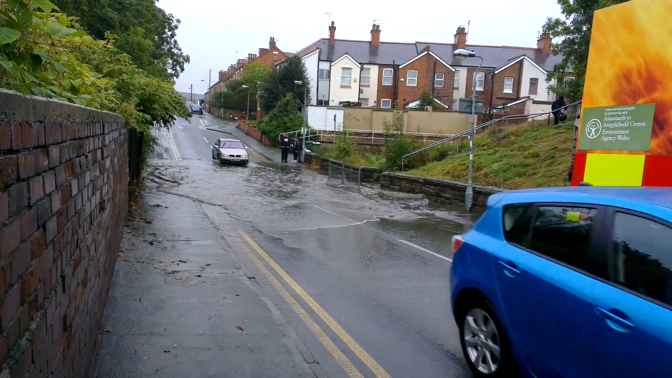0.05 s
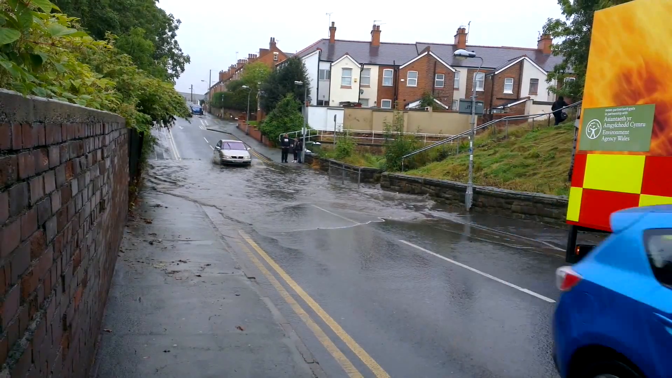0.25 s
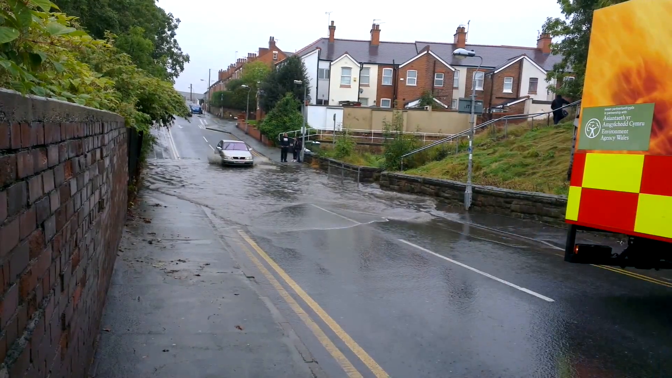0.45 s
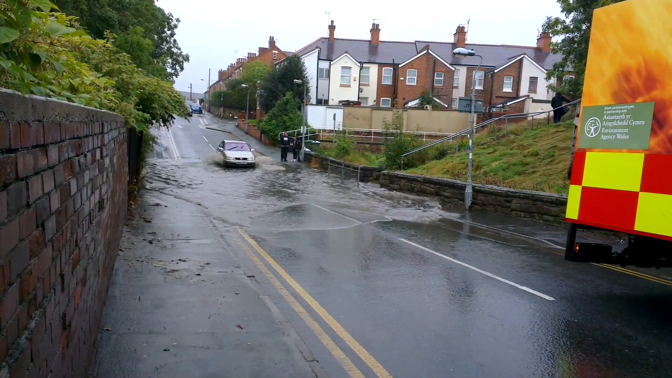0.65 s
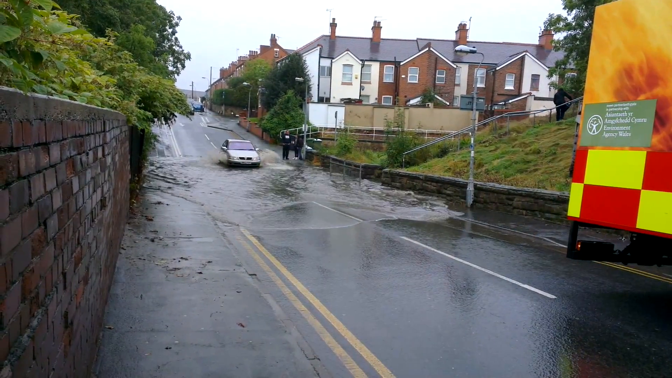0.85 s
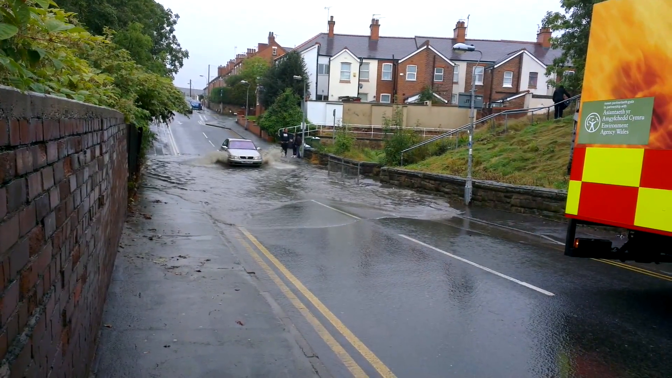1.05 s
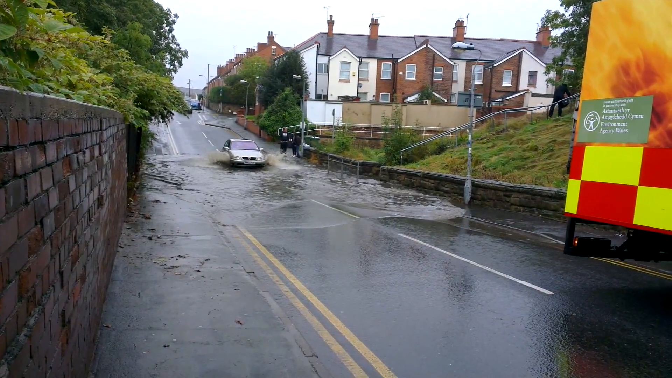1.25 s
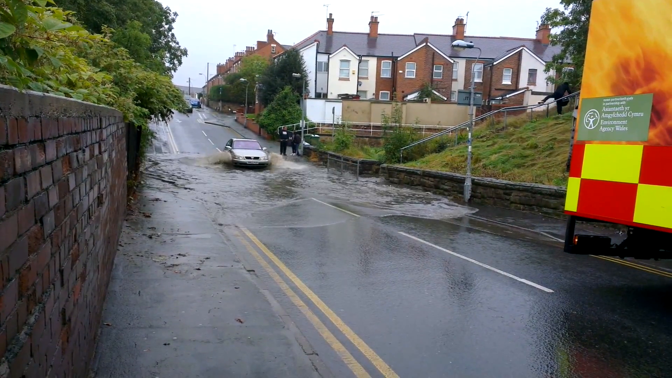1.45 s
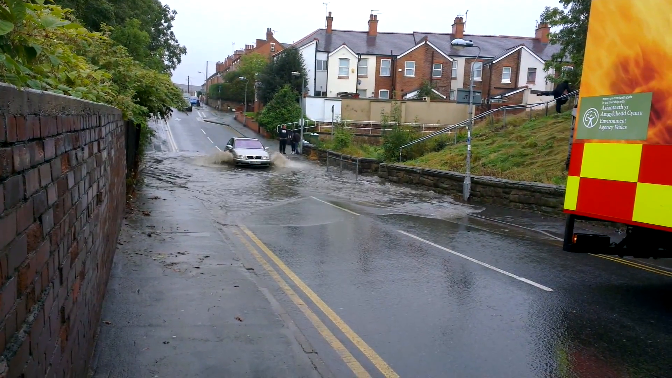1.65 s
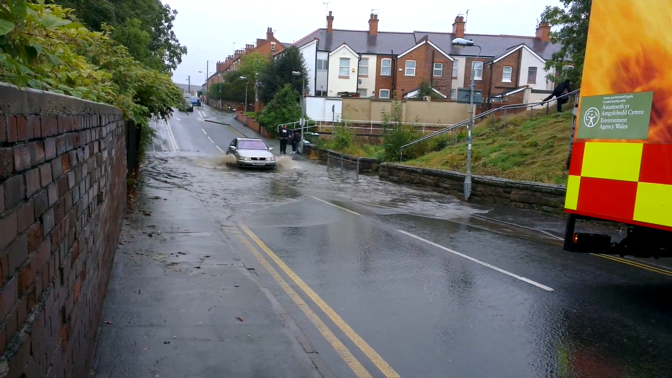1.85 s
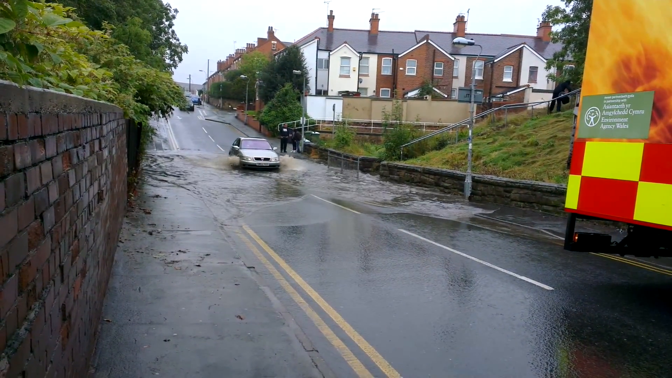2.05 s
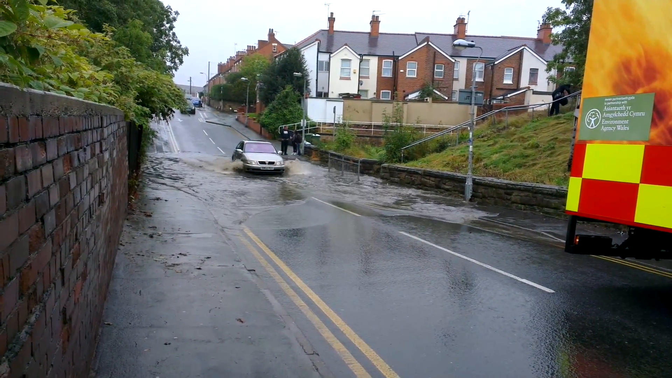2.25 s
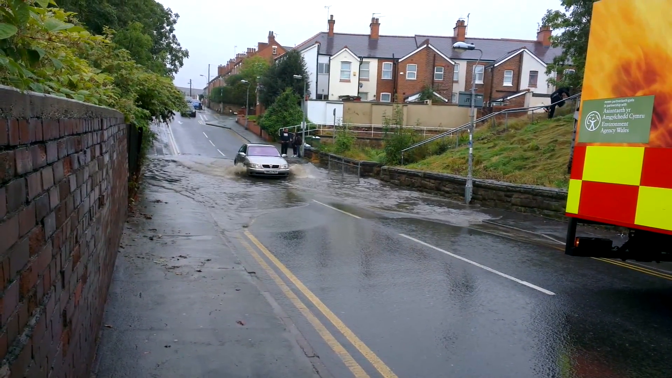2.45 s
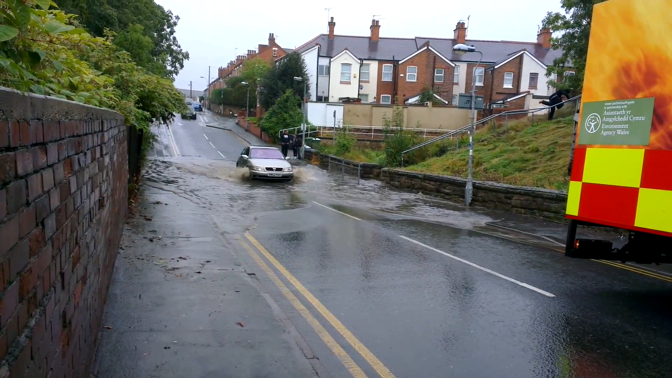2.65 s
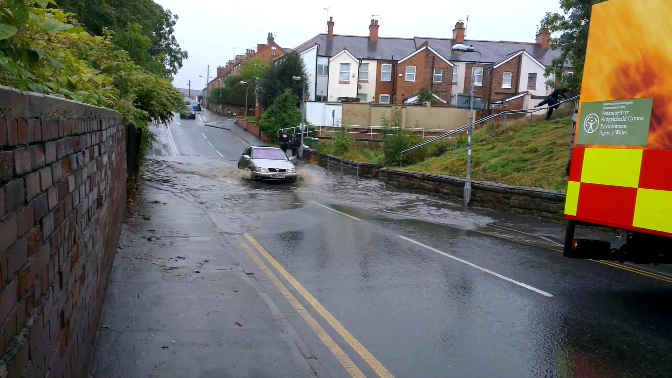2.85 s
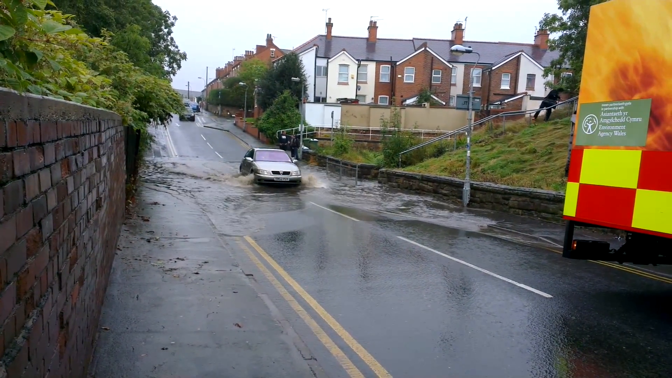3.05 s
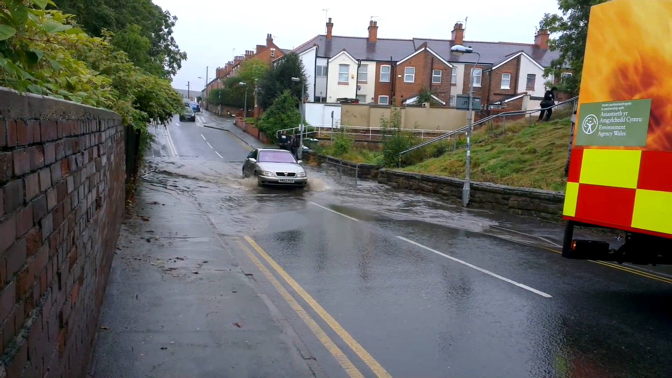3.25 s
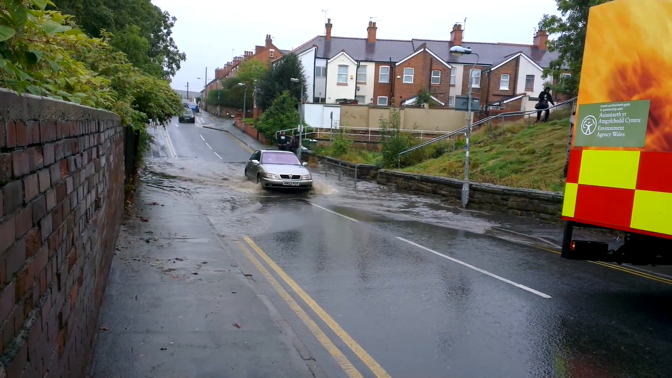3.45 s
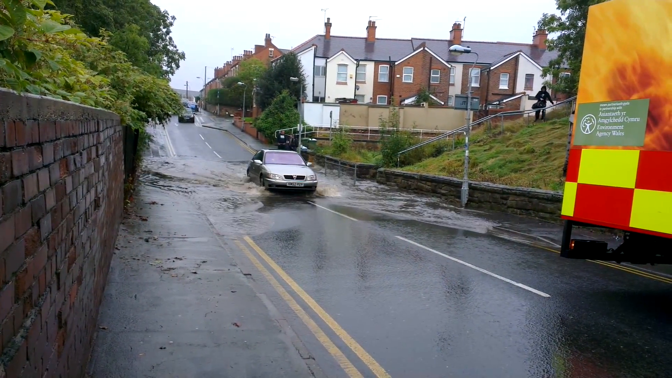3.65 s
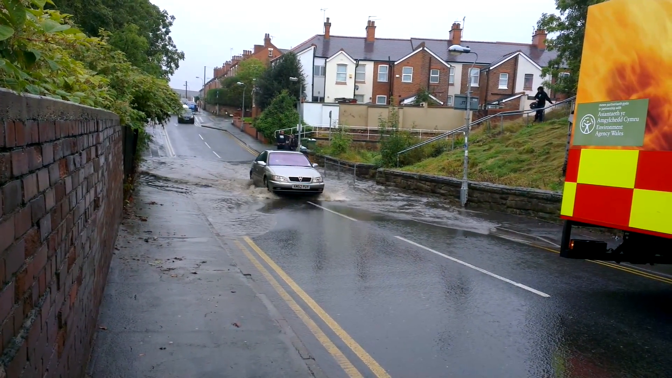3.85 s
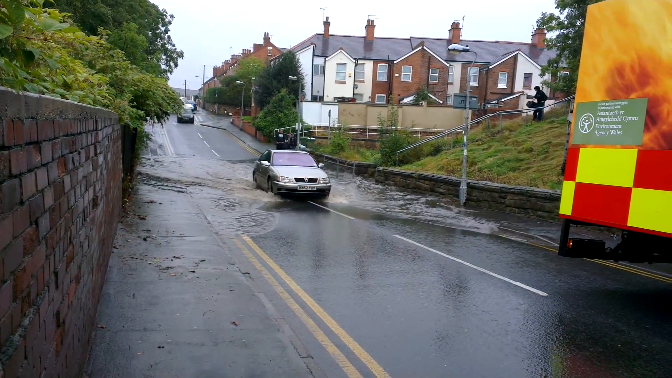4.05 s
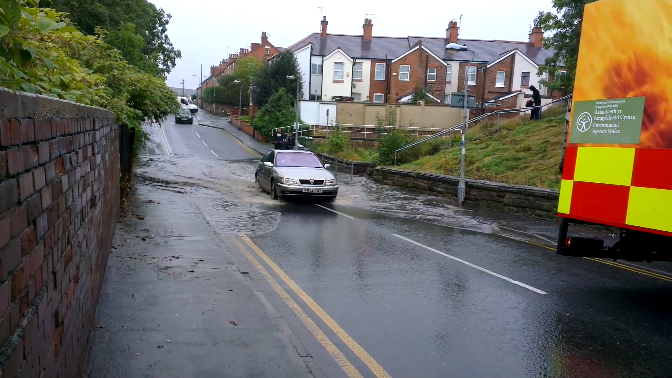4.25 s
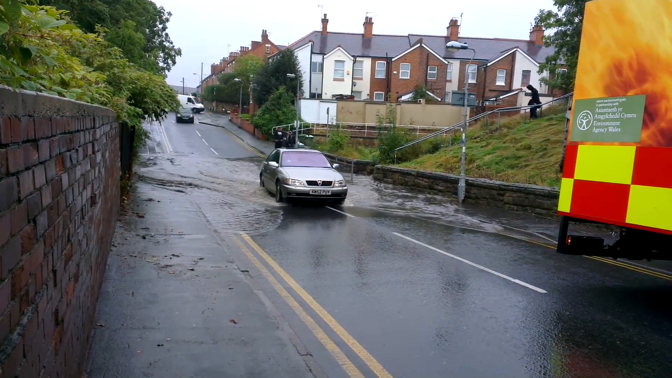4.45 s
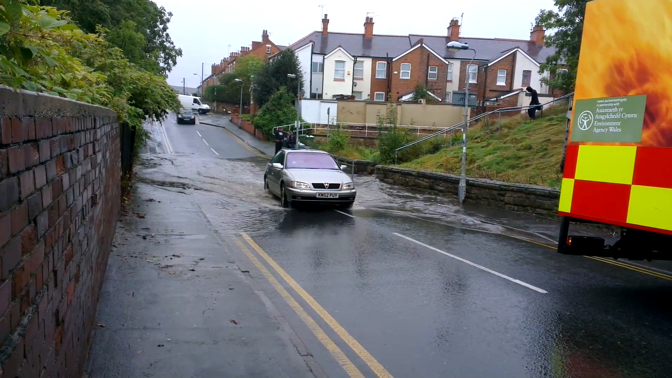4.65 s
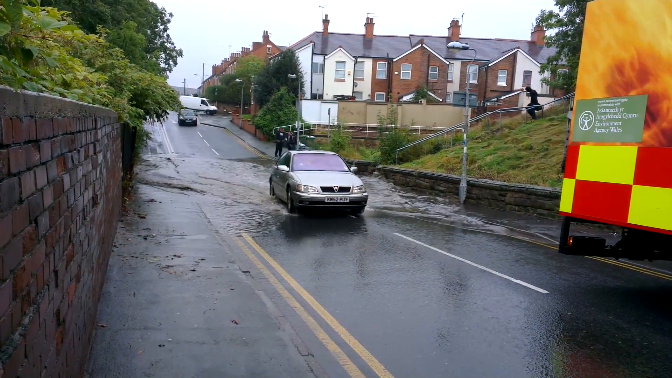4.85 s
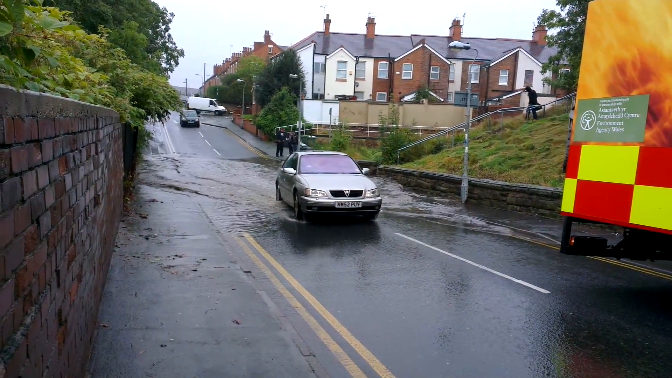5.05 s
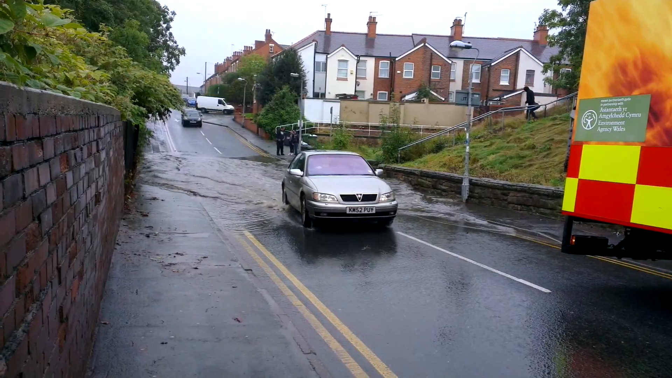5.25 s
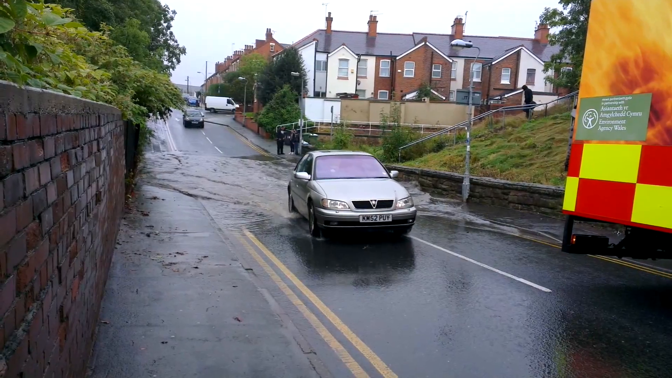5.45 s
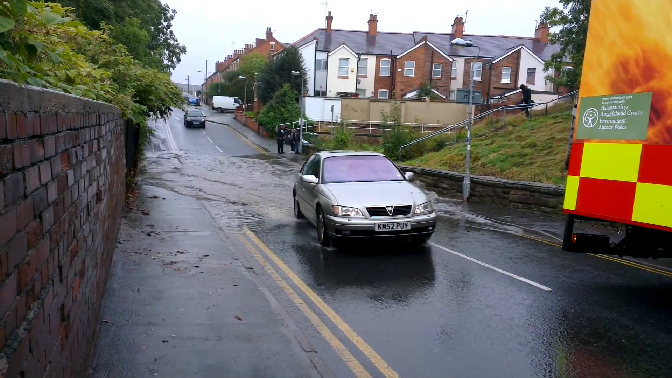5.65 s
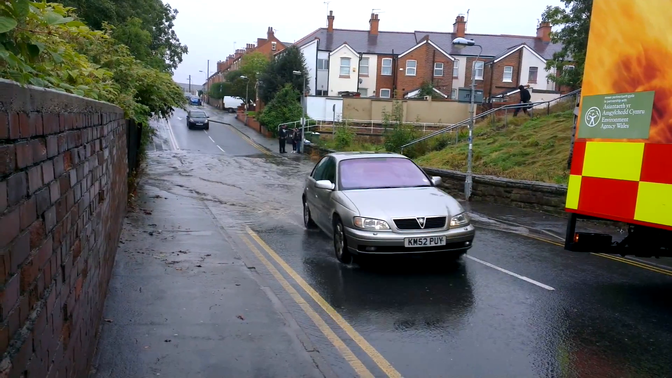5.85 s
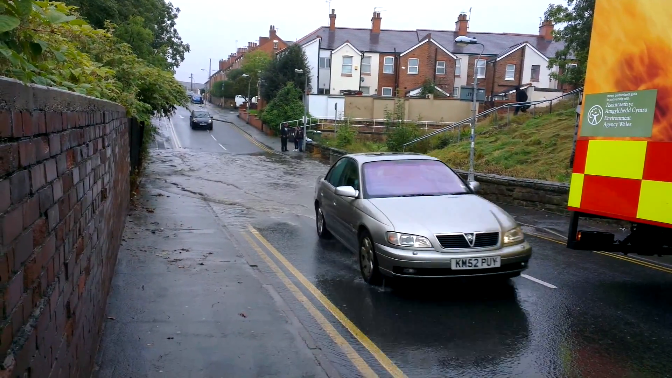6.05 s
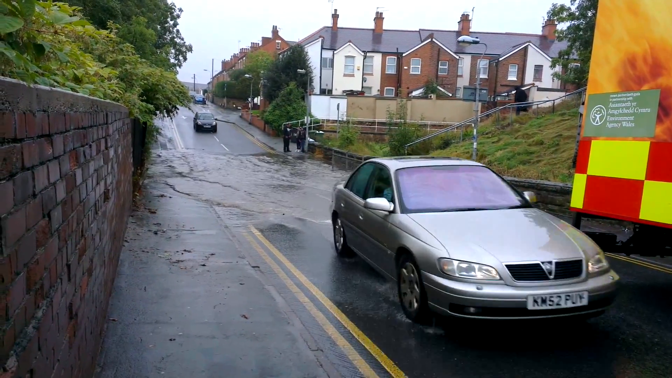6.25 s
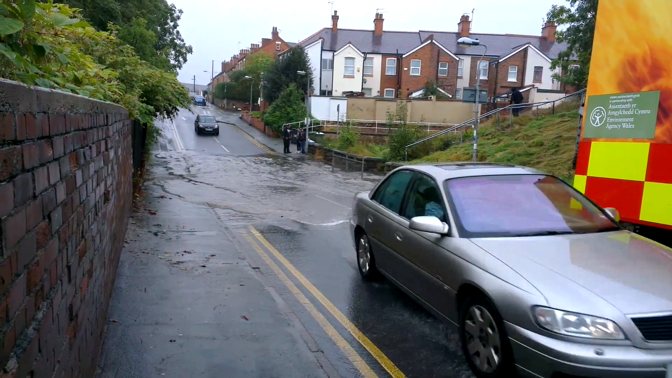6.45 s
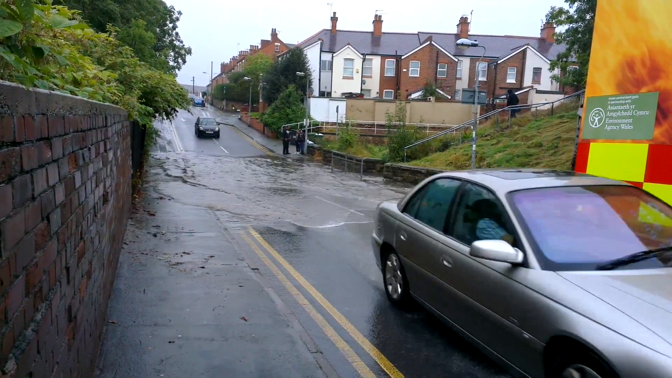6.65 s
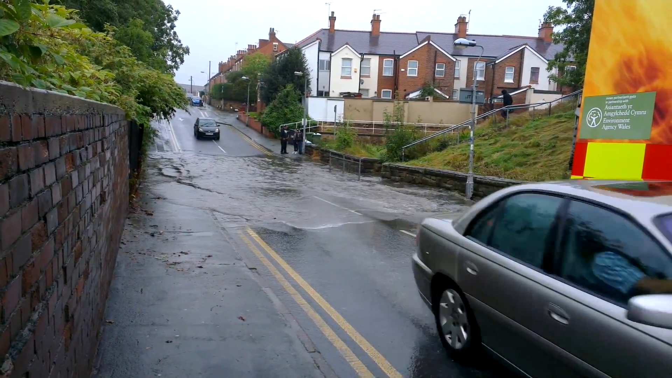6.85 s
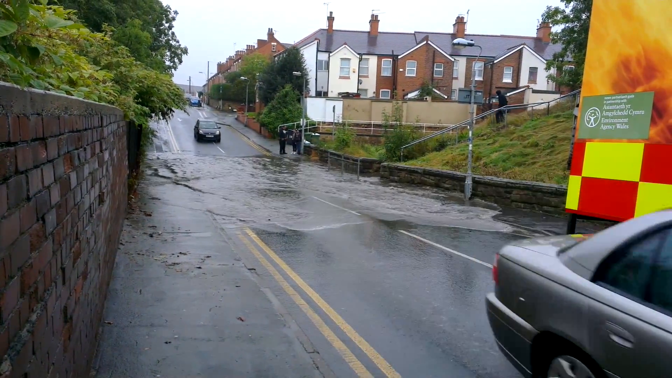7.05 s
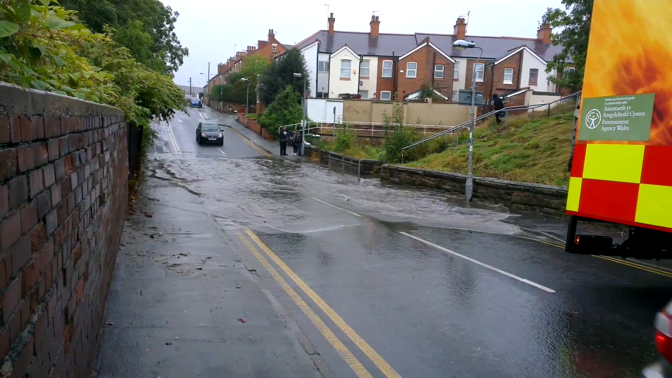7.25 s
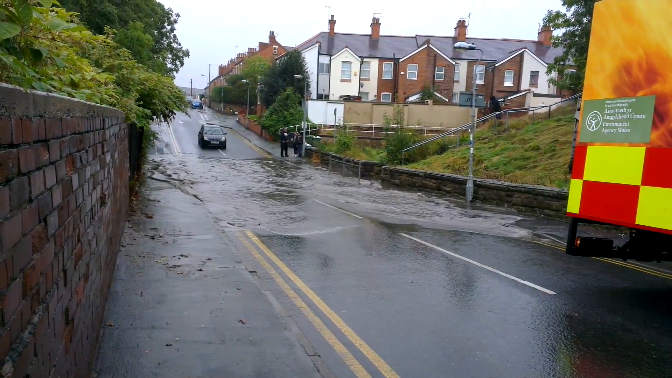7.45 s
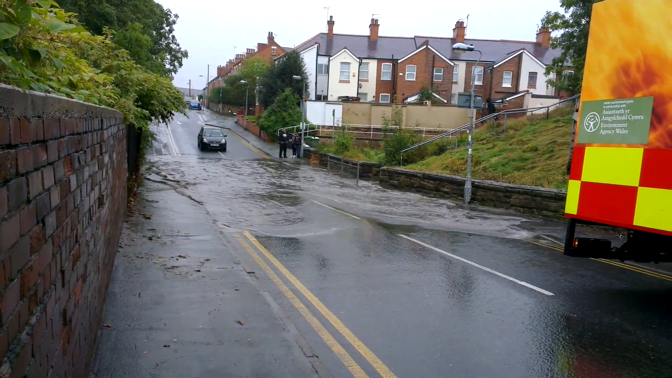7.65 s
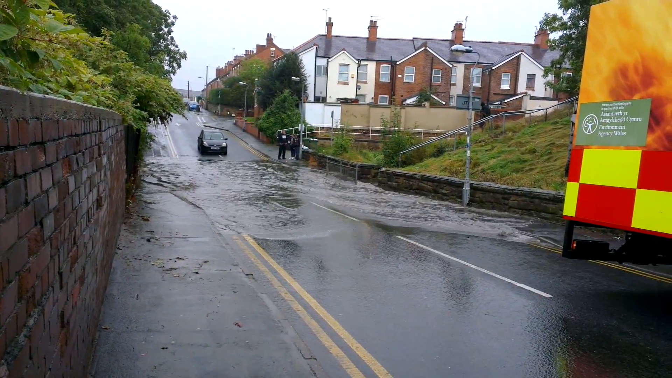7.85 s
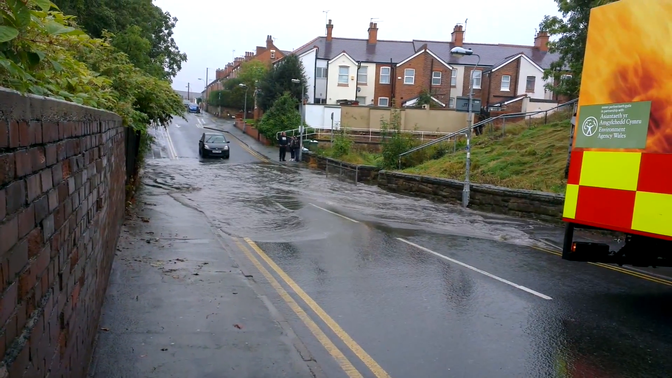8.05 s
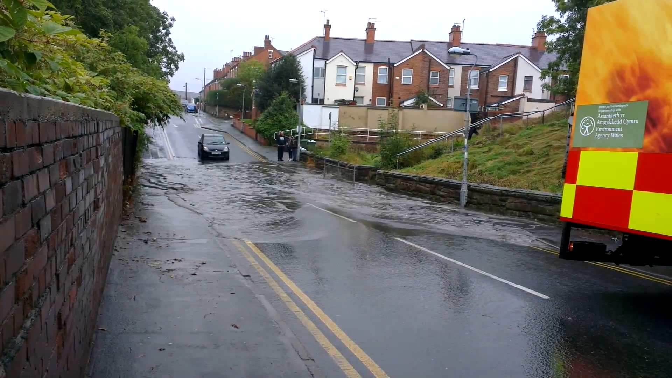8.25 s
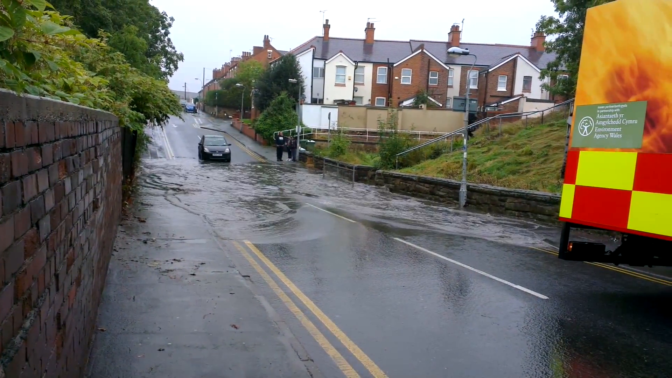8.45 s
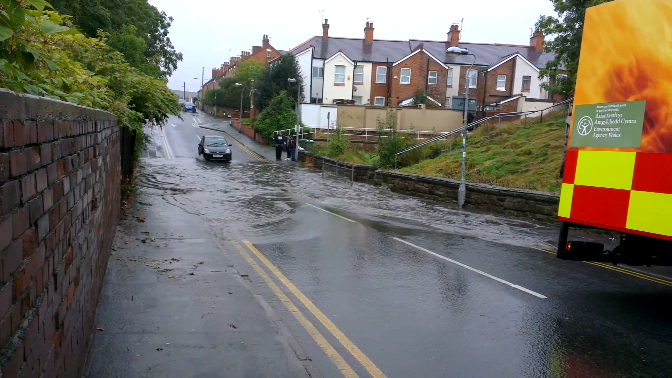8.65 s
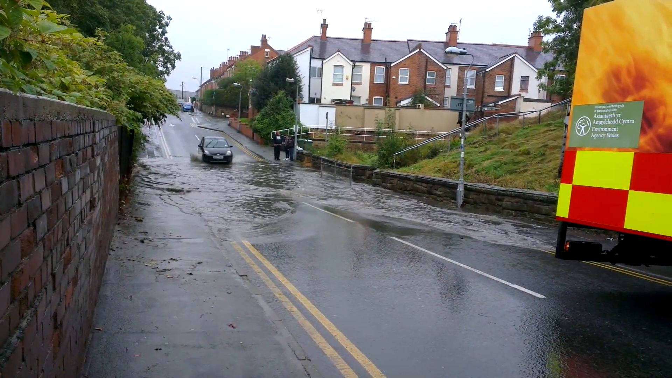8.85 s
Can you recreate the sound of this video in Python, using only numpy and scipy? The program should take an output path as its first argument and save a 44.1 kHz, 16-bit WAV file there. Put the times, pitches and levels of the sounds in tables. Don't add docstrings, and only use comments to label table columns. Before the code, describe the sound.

Outdoors by a wet road, thin-sounding wide stereo. Loud tyre hiss and splatter at the start drop away within about two seconds, leaving softer water wash and the fast, even chug of an idling diesel with irregular ticks to the right. A short high squeak slides downward, then another car rushes by close in a broad, gritty, fluttering wash of spray that ebbs to a lighter hiss and idle.

```python
import sys
import numpy as np
from scipy import signal
from scipy.fft import rfft, irfft, next_fast_len
from scipy.io import wavfile
from scipy.ndimage import uniform_filter1d

SR = 44100
rng = np.random.default_rng(int(sys.argv[2]) if len(sys.argv) > 2 else 0)


def gain_from_decibels(decibels):
    exponent = np.asarray(decibels, float) / 20
    return 10 ** exponent


def dump_mix(stems):
    frames = np.atleast_2d(stems).T
    limited = np.clip(frames, -1, 1)
    pcm = np.round(limited * 32767).astype(np.int16)
    wavfile.write(sys.argv[1], SR, pcm)


N = 392490
IDLE_HZ = 5.0


def evened(x):
    return x / np.sqrt(np.mean(x ** 2) + 1e-20)


def bump(x, centre, width):
    return np.exp(-.5 * ((x - centre) / width) ** 2)


def read(points, hz):
    f, value = np.transpose(points)
    return np.interp(np.log(hz + 1), np.log(f + 1), value)


def resonate(x, hz, width):
    turn = np.exp(2j * np.pi * np.cumsum(hz * np.ones(len(x))) / SR)
    r = np.exp(-np.pi * width / SR)
    return 2 * (turn * signal.lfilter([1 - r], [1, -r], x / turn)).real


def spectra(x):
    return signal.stft(x, SR, nperseg=512, noverlap=384)


# (frequency [Hz], side over mid [dB])
WIDTH_FAR = [(300, -18), (550, -5), (800, -8), (1200, 4.5), (1600, 3.5), (2500, -4.5), (4000, -2),
             (6000, -2.5), (9000, -1.5), (13000, -0.5)]
WIDTH_NEAR = [(300, -17), (550, -6.5), (800, -7.5), (1200, -3.5), (1600, 2), (2500, -3.5), (4000, -1),
              (6000, -1), (9000, -2.5), (13000, -2)]
# (frequency [Hz], share of side that follows mid [-])
LEAN = [(300, -0.15), (2100, 0.57), (3200, -0.12), (5000, -0.47), (7000, -0.86), (8200, -0.14),
        (9600, 0.51), (11500, 0.14), (14000, -1.7)]


def microphone_pair(z, hz, nearness):
    width_db = read(WIDTH_FAR, hz)[:, None] * (1 - nearness) + read(WIDTH_NEAR, hz)[:, None] * nearness
    lean = np.clip(read(LEAN, hz), -1, 1)[:, None]
    side = gain_from_decibels(width_db) * (lean * z[0] + np.sqrt(1 - lean ** 2) * z[1])
    return signal.istft(np.array([z[0], side]), SR, nperseg=512, noverlap=384)[1][:, :N]


# (time [s], wheels churning water [dB], water thrown up [dB], road roar lift [dB],
# left over right [dB])
CARS = [(0, -17.5, -13.5, -2, 4), (.57, -17, -15.5, 0.5, 5), (.8, -20.5, -20.5, 1.5, 1),
        (.85, -19, -26.5, 0.5, 0), (1.25, -17, -25.5, 0, -4), (1.7, -22, -30.5, -0.5, -0.5),
        (2.3, -24.5, -30, 1.5, -1), (3.9, -26, -28, 2, 0), (4.83, -29.5, -29, 1.5, 1),
        (4.96, -22, -22.5, -1.5, 2.5), (5.5, -19.5, -17, 1, 2), (6.1, -20, -15, -1.5, 0.5),
        (6.6, -15.5, -13, -1, 5), (7.1, -17, -12, 3.5, 1), (7.5, -18.5, -17, 3.5, 3.5),
        (7.85, -16.5, -25.5, 2, -4), (8.3, -20.5, -31.5, 0, -1.5), (8.9, -22.5, -34.5, -5.5, 4.5)]
# (time [s], length [s], change
# of roar and churn [dB], change of spray and mist [dB])
SURGES = [(0.104, .03, 2, 2.5), (.24, 0.049, 1.6, 2), (.305, .018, -2.5, -4),
          (0.394, 0.014, 1.5, 2.5), (.47, 0.04, -1.5, -3), (0.568, 0.026, 3, 2),
          (.66, 0.044, -2, -3.5), (0.766, .03, 0.5, 2), (0.85, 0.018, -2, -1.5),
          (.915, 0.019, 4.5, 4), (1.107, 0.026, 2, 0.5), (1.208, 0.052, 0, 3.5), (1.57, .05, 1, 1),
          (1.713, 0.021, -2.5, -2), (1.78, 0.027, 3, 0), (1.99, 0.036, 2.5, 0.5),
          (3.04, .04, -3.5, -3), (3.18, 0.022, 1, 1.5), (3.62, 0.044, 2.5, 0.5),
                 (3.7, .025, -0.5, -3.5), (3.99, 0.025, 3.5, 3.5), (4.054, 0.018, 1, 3),
                 (4.188, 0.023, 2.5, 4.5), (4.366, 0.029, 1, 2.5), (4.49, 0.044, -1.5, -2.5),
                 (4.862, 0.019, 3, 0.5), (5.725, 0.074, .8, 2), (5.832, 0.03, -5, -3),
                 (6.04, .03, -1, -1), (6.214, .07, 2, 0.7), (6.52, 0.046, 2.5, .3),
                 (6.826, .05, -5.5, -2.5), (6.891, .012, 5.5, 3), (6.927, 0.037, -6.5, -2.2),
                 (7.318, .08, 2, .6), (7.6, 0.039, -1.5, -3.5), (7.78, .03, 2, 3),
                 (7.831, 0.019, -3.5, -6), (7.882, .022, 4, 8), (7.937, 0.028, -4.5, -2.5),
                 (8.04, 0.044, 0, 3), (8.19, 0.033, 2.5, 3.5), (8.27, .03, -2, -1.5), (8.4, .03, 2, 1),
                 (8.703, 0.028, 2.5, 2), (8.85, .02, 0, 5.5)]
LEAVES_S = [
    .84,
    7.7,
]


def car_levels_db(t):
    s, *controls, _ = np.transpose(CARS)
    wheels, thrown, roar_lift = (np.interp(t, s, c) for c in controls)
    surges = SURGES
    low, high = sum(np.outer(db, bump(t, at, length)) for at, length, *db in surges)
    shade = sum(-6.5 * (t > at) * np.exp(-abs(t - at) / .45) for at in LEAVES_S)
    roar = -12.5 + .6 * wheels + roar_lift + low
    mist = -0.84 + 1.513 * thrown + high + shade
    return roar, wheels + low, thrown + high, mist


# (time [s], cavity pitch [Hz], cavity lift [dB], 1.6 kHz tread hum lift [dB], 4 kHz sizzle lift [dB])
ARCH = [(0, 2950, 1.7, 4, -2), (.55, 2850, 1, 3, -2.5), (.8, 2800, 1.5, 2.5, -4.5),
        (1.1, 2750, 1.2, 0.8, -0.5), (1.6, 2750, 0.3, 0.5, 1.2), (3.3, 2758, 0, -3, 0.5),
        (4.93, 2730, 1, -1.2, 0.5), (5.15, 2960, -2.7, -1.5, -0.3), (5.7, 3000, -1.2, -.6, 2),
        (6.1, 3050, 1, 0.5, 0), (6.6, 2900, 1.2, 1.5, 0), (7.09, 3160, 3.5, 0.5, -.8),
        (7.5, 2970, 1.5, 0, -2.5), (8.06, 2720, -0.5, 0, 0), (8.75, 2660, 1.8, 6.5, 1)]


def wheel_arch_db(hz, t):
    s, *arch = np.transpose(ARCH)
    cavity_hz, cavity_db, tread_db, sizzle_db = (np.interp(t, s, c) for c in arch)
    f = hz[:, None]
    return cavity_db * bump(f, cavity_hz, 300) + tread_db * bump(f, 1600, 350) + sizzle_db * bump(f, 4250, 450)


# (time [s], delay [ms], ripple [dB])
ROAD_ECHO = [
    (5.1, 0.59, 1),
    (5.6, .68, 0),
    (6.2, 0.89, 1),
    (6.55, 1.1, 1),
    (7.0, 1.23, 1),
]


def road_echo_db(hz, t):
    s, delay_ms, ripple_db = np.transpose(ROAD_ECHO)
    delay_s = np.interp(t, s, delay_ms) / 1e3
    return np.interp(t, s, ripple_db) * np.cos(2 * np.pi * np.outer(hz, delay_s))


def thinning_db(hz, spray_db):
    faint_db = np.minimum(uniform_filter1d(spray_db, size=60) + 30.5, 0)
    return 2.2 * faint_db * np.clip((hz[:, None] - 10500) / 1100, 0, 3)


# (frequency [Hz], density [dB per Hz])
ROAR = [
    [(88, -75), (150, -43), (333, -12), (412, -15), (676, -2), (1060, 2.5), (1310, -6), (1470, -2.5), (2200, -7), (2860, -8), (4840, -120)],
    [(88, -55), (150, -49.5), (534, -12), (578, -4), (639, -8), (1130, 2.5), (1920, -3), (2200, 2.5), (2860, -4.5), (4840, -120)],
]
CHURN = [
    [(1120, -38), (1900, -7.5), (2110, -5.5), (2510, 3), (3180, -1), (4000, -8.5), (5200, -22), (8800, -120)],
    [(1120, -39), (1900, -7.5), (2170, -9), (2360, 1), (2970, 3.5), (4000, -6), (5200, -17), (8800, -120)],
]
SPRAY = [
    [(2120, -15.5), (3600, -8), (4340, 0), (4860, -5.5), (6950, -2.5), (8140, -10), (10000, -16.5), (13000, -35), (22000, -120)],
    [(2120, -25.5), (3600, 0.5), (4610, -0.5), (5130, -1.5), (6920, 2), (8990, -8), (10000, -26), (13000, -25), (22000, -120)],
]
MIST = [
    [(5590, -11.5), (9500, 2), (10400, -11), (11400, -5.5), (15600, -19)],
    [(5590, -20.5), (9500, -1.5), (10800, -11.5), (11800, -12), (15100, -21.5), (15600, -20)],
]


def tyres(patchy_db=1.35, flicker_db=0.68, drops_db=1.5):
    drops = gain_from_decibels(drops_db * evened(uniform_filter1d(rng.standard_normal(N), 40)))
    hz, t, z = spectra(rng.standard_normal((2, N)) * evened(drops))
    levels_db = car_levels_db(t)
    spray_db = levels_db[2]
    far_db, near_db = -27.5, -17
    nearness = np.clip((spray_db - far_db) / (near_db - far_db), 0, 1)

    power = 0
    for shapes, db in zip((ROAR, CHURN, SPRAY, MIST), levels_db):
        far, near = (evened(gain_from_decibels(read(shape, hz))) ** 2 for shape in shapes)
        colour = np.outer(far, 1 - nearness) + np.outer(near, nearness)
        power = power + colour * gain_from_decibels(db) ** 2

    patches = uniform_filter1d(rng.standard_normal((len(t), len(hz))).T, 8, 0)
    patches = evened(uniform_filter1d(patches, size=44, axis=1))
    flicker = evened(uniform_filter1d(rng.standard_normal(len(t)), 10))
    lift_db = wheel_arch_db(hz, t) + road_echo_db(hz, t) + thinning_db(hz, spray_db)
    lift_db += patchy_db * patches + flicker_db * flicker
    mid, side = microphone_pair(z * np.sqrt(power) * gain_from_decibels(lift_db), hz, nearness)

    s, *_, pan_db = np.transpose(CARS)
    pan = np.interp(np.arange(N) / SR, s, pan_db)
    drift = np.tanh(pan * np.log(10) / 40)
    return np.array([mid, side + drift * mid])


# (time [s], pitch [Hz], level [dB])
SQUEAK = [
    (5.22, 6150, -40),
    (5.27, 6000, -24),
    (5.33, 5970, -22.5),
    (5.38, 5760, -24),
    (5.46, 5600, -28),
    (5.56, 5450, -37),
]


def squeak(width=130, fuzz=.8):
    s, hz, db = np.transpose(SQUEAK)
    t = np.arange(N) / SR
    pitch = np.interp(t, s, hz)
    whistle = np.sin(2 * np.pi * np.cumsum(pitch) / SR)
    tone = whistle + fuzz * evened(resonate(rng.standard_normal(N), pitch, width))
    return gain_from_decibels(np.interp(t, s, db, -99, -99)) * tone * np.array([[1], [-.3]])


CYLINDERS_DB = [1.2, -8, -1, -1.5, 0.8, -3.5]
# (frequency [Hz], density [dB per Hz])
CLATTER = [(120, -62), (200, -35.5), (341, -12.5), (1040, 0), (1510, -6), (2750, -0.5), (4330, -8.5),
           (4830, -12), (6720, -10), (8500, -21.5), (11000, -47), (18700, -120)]


def diesel(level_db=-27.5, first_s=.179, rise_s=0.0053, ring_s=0.016, uneven_db=2.5):
    firing_hz = 6 * IDLE_HZ
    firings = np.arange(-1, firing_hz * N / SR)
    at_s = first_s % (1 / firing_hz) + firings / firing_hz
    at = np.round(at_s * SR).astype(int).clip(0, N - 1)
    strength_db = np.resize(np.roll(CYLINDERS_DB, 6), len(at))
    knocks = np.zeros(N)
    knocks[at] = gain_from_decibels(strength_db + uneven_db * rng.standard_normal(len(at)))
    t = np.arange(2500) / SR
    burst = (1 - np.exp(-t / rise_s)) * np.exp(-t / ring_s)
    swell = signal.oaconvolve(knocks, burst)[:N]
    hz, _, z = spectra(rng.standard_normal((2, N)) * evened(swell))
    colour = evened(gain_from_decibels(read(CLATTER, hz)))
    return gain_from_decibels(level_db) * microphone_pair(z * colour[:, None], hz, 0)


# (time [s], peak level [dB])
TICKS = [(1.38, -17), (1.586, -19), (1.78, -13), (1.9205, -24), (1.987, -21), (2.18, -19), (2.3161, -17.5),
         (2.382, -15), (2.58, -11.5), (2.714, -15), (2.787, -18), (2.98, -14), (3.177, -8.5), (3.38, -15.5),
         (3.5818, -16), (3.72, -19), (3.783, -12.5), (3.9908, -26), (4.176, -16), (4.3849, -25),
         (4.52, -22), (4.584, -14), (4.7182, -19), (5.186, -9), (6.187, -7.5), (7.776, -16), (7.9773, -14),
         (8.172, -13), (8.38, -18), (8.51, -17.5)]
# (frequency [Hz], width [Hz], level [dB])
TICK_RING = [(4150, 650, 3), (2900, 850, -1.5), (6560, 1100, -6)]


def ticks(below_peak_db=-9, length_s=0.022, tail_s=0.016, side=-0.57):
    t, swell = np.arange(N) / SR, np.zeros(N)
    for s, db in TICKS:
        start = round(s * SR)
        u = t[start:][:4000] - s
        tail = np.exp(-np.maximum(u - length_s, 0) / tail_s)
        swell[start:][:4000] += gain_from_decibels(db) * np.minimum(u / .002, 1) * tail

    def cover(x):
        return evened(sum(gain_from_decibels(db) * evened(resonate(resonate(x, f, w), f, w)) for f, w, db in TICK_RING))

    rings = [cover(x) for x in rng.standard_normal((2, N))]
    return gain_from_decibels(below_peak_db) * swell * np.array([rings[0], side * rings[0] + 0.48 * rings[1]])


# (multiple of the firing rate [-], level [dB rms])
EXHAUST = [(9, -59), (12, -55), (15, -53), (19, -44.5)]


def exhaust(waver=0.0017, flutter_db=4.0):
    speed = 1 + waver * evened(uniform_filter1d(rng.standard_normal(N), 15000))
    turns = np.cumsum(6 * IDLE_HZ * speed) / SR
    hum = sum(gain_from_decibels(db) * np.sqrt(2) * np.sin(2 * np.pi * (k * turns + rng.random())) for k, db in EXHAUST)
    flutter = evened(uniform_filter1d(uniform_filter1d(rng.standard_normal(N), 6000), 3000))
    return hum * gain_from_decibels(flutter_db * flutter - 4.5) * np.array([[1], [.1]])


def low_rumble():
    low_pass = signal.butter(4, 190, fs=SR, output="sos")
    return gain_from_decibels(-76.5) * evened(signal.sosfilt(low_pass, rng.standard_normal((2, N))))


def scene():
    mid, side = tyres() + squeak() + diesel() + ticks() + exhaust()
    return np.array([mid + side, mid - side])


# (time [s], change [dB], length [s])
LULLS = [(0.968, -3.5, 0.025), (3.035, -2.5, 0.0091), (5.824, -3.5, 0.012), (6.779, -5.5, 0.006),
         (6.866, -8, 0.0081), (6.935, -2, 0.028), (7.28, -4, 0.0047), (0.314, 3.5, 0.005),
         (1.044, 3, 0.0041), (1.088, 1.5, 0.0048), (7.44, 4, .006), (7.702, 3.5, .01), (8.393, 2, 0.009),
         (8.317, 2, .006), (8.63, 0, 0.0049)]


def level_swings():
    t = np.arange(N) / SR
    return gain_from_decibels(sum(db * bump(t, s, length) for s, db, length in LULLS))


def widen(x, echo_s=88.6 / 44100, share=.72):
    mid, side = (x[0] + x[1]) / 2, (x[0] - x[1]) / 2
    size = next_fast_len(N + 200)
    echo = 1 + share * np.exp(-2j * np.pi * np.fft.rfftfreq(size, 1 / SR) * echo_s)
    side = irfft(rfft(side, size) * echo, size)[:N] / np.sqrt(1 + share ** 2)
    return np.array([mid + side, mid - side])


def overload(x, ceiling=0.97, knee=13):
    return x / (1 + abs(x / ceiling) ** knee) ** (1 / knee)


# (frequency [Hz], threshold over the local mean [dB])
GATE = [(7000, -23.5), (9000, -10), (10200, 1.5), (15000, 2.5)]


def gate(x, wander_db=3.5, left_db=-25, faint_db=-92, ease=0.38):
    hz, t, z = signal.stft(x, SR, nperseg=1024, noverlap=768)
    power = abs(z) ** 2
    local = uniform_filter1d(uniform_filter1d(power, 24, 1), 8, 2)
    strips = uniform_filter1d(rng.standard_normal((len(t), len(hz))), 8, 1)
    strips = evened(uniform_filter1d(strips, 16, 0)).T
    loudness = local.sum((0, 1))
    quiet_db = 10 * np.log10(loudness / loudness.max() + 1e-9)
    over_db = read(GATE, hz)[:, None] + wander_db * strips + ease * quiet_db
    threshold = local * gain_from_decibels(over_db) ** 2 + gain_from_decibels(faint_db) ** 2 * (hz[:, None] > 11000)
    kept = z * np.where(power > threshold, 1, gain_from_decibels(left_db))
    lost = power.sum((0, 2)) / (abs(kept) ** 2 + 1e-20).sum((0, 2))
    makeup = np.sqrt(uniform_filter1d(lost, 24))[:, None]
    return signal.istft(kept * makeup, SR, nperseg=1024, noverlap=768)[1][:, :N]


def top_cut(x):
    return signal.sosfilt(signal.butter(12, 15780, fs=SR, output="sos"), x)


def record(dry):
    bass_cut = signal.butter(6, 265, "high", fs=SR, output="sos")
    x = signal.sosfilt(bass_cut, dry * level_swings())
    x = widen(x) + low_rumble()
    mix = gate(overload(x))
    return top_cut(mix)


dry = scene()
out = record(dry)
dump_mix(out)
```